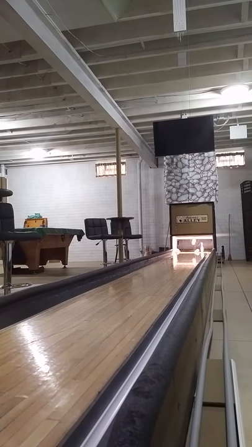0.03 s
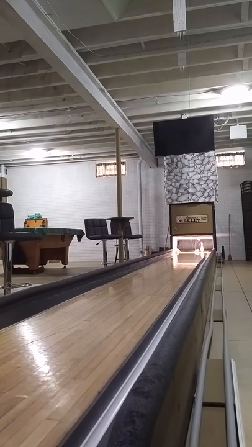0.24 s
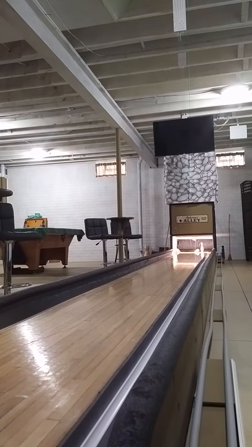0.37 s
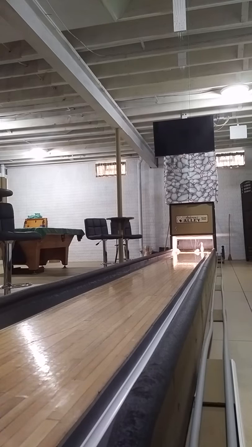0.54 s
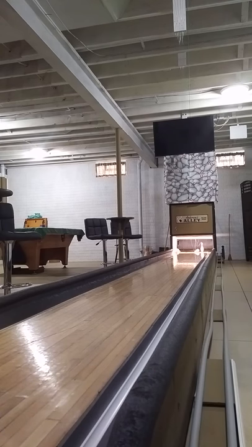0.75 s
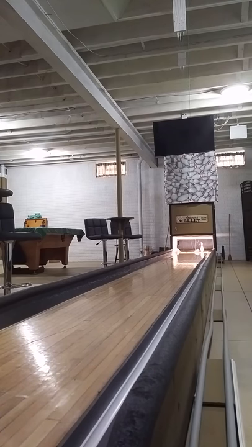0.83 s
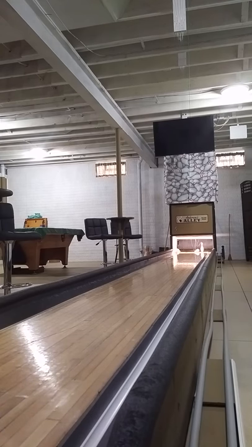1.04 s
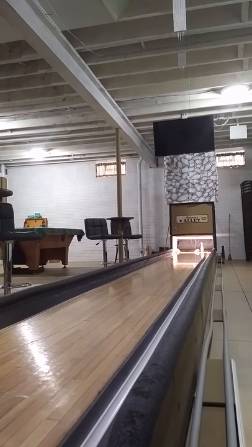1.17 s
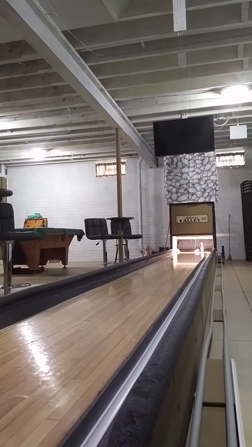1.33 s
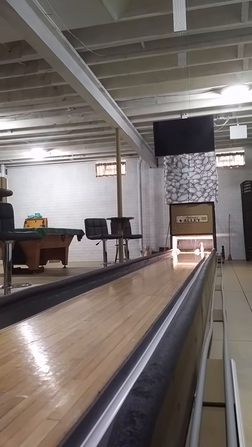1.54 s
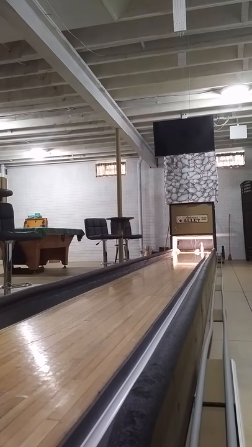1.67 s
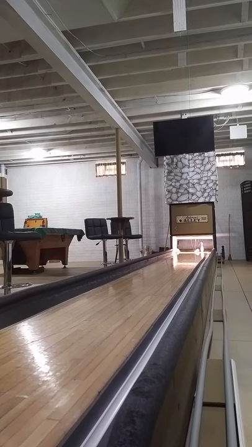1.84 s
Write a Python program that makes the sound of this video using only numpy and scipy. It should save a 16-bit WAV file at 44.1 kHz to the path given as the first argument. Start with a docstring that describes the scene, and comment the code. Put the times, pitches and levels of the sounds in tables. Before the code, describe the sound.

Distant bowling pins knock together hollowly as a pin-setting machine rumbles and hums in a quiet basement

```python
"""Quiet room tone and a thin whine, then a faint dull noise: a string pinsetter far down a small basement bowling lane.
Wooden pins clunk on each other and the rack, rumble and jostle on their strings, then knock once more.
Clunks and rumble are noise shaped into room echoes; each clunk also rings the machine's housing as decaying sines.
Wavering tones make the motor's hum and the frame's drone; short bursts of band noise make the taps."""
import sys
import numpy as np
from scipy import signal
from scipy.fft import rfft, irfft
from scipy.io import wavfile

SR = 44100
rng = np.random.default_rng(int(sys.argv[2]) if len(sys.argv) > 2 else 0)


def inscribe(sig):
    """Save sig as 16-bit PCM at rate SR to the path in sys.argv[1].

    A 1-D sig is mono; a 2-D sig holds one channel per row.
    Samples are clipped to [-1, 1] before scaling.
    """
    pcm = np.round(np.clip(np.atleast_2d(sig).T, -1, 1) * 32767)
    wavfile.write(sys.argv[1], SR, pcm.astype(np.int16))


N = 83790  # samples, 1.9 s


def amp(db):
    """Decibels to gain."""
    return 10 ** (np.asarray(db) / 20)


def unit(x):
    """Scales to an rms of one."""
    return x / np.sqrt(np.mean(x ** 2) + 1e-20)


def by_hz(points, hz):
    """Reads a (hz, value) table on a log-frequency axis."""
    f, value = np.transpose(points)
    return np.interp(np.log(hz + 1), np.log(f + 1), value)


def level(points):
    """Gain for every sample from a (time_s, level_db) curve."""
    return amp(np.interp(np.arange(N) / SR, *np.transpose(points)))


def dying(t, t60):
    """Exponential decay that falls 60 dB in t60 seconds."""
    return np.exp(-np.log(1000) * t / t60)


def add(mix, s, sound):
    """Mixes a sound in at a time in seconds."""
    part = mix[max(round(s * SR), 0):][:len(sound)]
    part += sound[:len(part)]


def coloured(x, points):
    """Filters a sound by a (hz, level_db) curve."""
    gain = amp(by_hz(points, np.fft.rfftfreq(len(x), 1 / SR)))
    return irfft(rfft(x) * gain, len(x))


def room_echoes(colour):
    """A blow as the room returns it: dense echoes that build up and die away band by band."""
    # decay of the room: hz, t60_s
    room = [(60, 1.57), (130, 0.59), (300, 0.68), (700, 0.78), (1800, 0.79), (5000, 0.56), (12000, 0.29)]
    # time constant of the echoes' build-up: hz, rise_s
    build_up = [(60, 0.027), (250, 0.015), (700, 0.0022), (2000, 0.0055), (8000, 0.0081)]
    echo_spread_db, mixing_s = 2.5, 0.026  # early echoes are uneven, later ones blend
    t, hz = np.arange(N) / SR, np.fft.rfftfreq(N, 1 / SR)
    uneven = np.interp(t, np.linspace(0, N / SR, N // 64), rng.standard_normal(N // 64))
    echoes = rng.standard_normal(N) * amp(echo_spread_db * uneven * np.exp(-t / mixing_s))
    spectrum = rfft(echoes) * amp(colour(hz))
    centres = np.geomspace(60, 12000, 9)
    out = np.zeros(N)
    # overlapping bands, each with a weight of one at its own centre and zero at the others
    for centre, pick in zip(centres, np.eye(len(centres))):
        band = irfft(spectrum * by_hz(np.c_[centres, pick], hz), N)
        rise = 1 - np.exp(-t / by_hz(build_up, centre))
        out += band * rise * dying(t, by_hz(room, centre))
    return out


def wavering(lines, depth, rate_hz):
    """Tones whose strength and phase drift as slow noise, brought together to an rms of one."""
    t, hz = np.arange(N) / SR, np.fft.rfftfreq(N, 1 / SR)
    lowpass = np.exp(-(hz / rate_hz) ** 2)
    out = np.zeros(N)
    for line_hz, db in lines:
        swell, drift = (unit(irfft(rfft(z) * lowpass, N)) for z in rng.standard_normal((2, N)))
        phase = 2 * np.pi * line_hz * t + 2 * depth * drift
        out += amp(db) * (1 + .5 * depth * swell) * np.sin(phase)
    return unit(out)


def air():
    """Still air and microphone hiss as coloured noise, with a thin electrical whine as a steady sine."""
    # colour of the hiss: hz, relative_level_db (per Hz)
    air_colour = [(25, -4), (60, -4.5), (130, -2), (180, -2.5), (300, -3), (450, -2.5), (600, -8),
                  (1200, -10), (2200, -11.5), (4200, -18), (6300, -10.5), (8200, -21.5), (11000, -25),
                  (15500, -28.5)]
    # its strength: time_s, level_db
    air_curve = [(0, -61), (.2, -63.5), (1.0, -58.5), (1.9, -67.5)]
    whine_hz, whine_db = 13060, -77  # rms level
    whine = amp(whine_db) * np.sqrt(2) * np.sin(2 * np.pi * whine_hz * np.arange(N) / SR)
    hiss = unit(coloured(rng.standard_normal(N), air_colour))
    return hiss * level(air_curve) + whine


def dull_noise():
    """A faint dull noise, mostly below 2 kHz, that swells just before the first clunk and fades."""
    # strength of the noise: time_s, level_db
    noise_curve = [(.12, -83), (.142, -56), (.17, -49), (.2, -55), (.26, -75)]
    # its colour: hz, relative_level_db (per Hz)
    noise_colour = [(50, -14), (140, -12), (300, -5), (700, -2), (1200, -7), (1750, -7.5), (2100, -23.5),
                    (8000, -42)]
    sounding = np.arange(N) / SR < noise_curve[-1][0]
    return unit(coloured(rng.standard_normal(N), noise_colour)) * level(noise_curve) * sounding


def rack():
    """The moving rack: many small dull jolts at random moments blur into a rumble in the room."""
    # strength of the jolting: time_s, level_db
    rumble_curve = [(.12, -83), (.2, -61), (.36, -37.5), (.45, -58), (.6, -35.5), (.8, -38), (.89, -37.5),
                    (.97, -31), (1.08, -35), (1.2, -32), (1.31, -44), (1.37, -49), (1.55, -57.5),
                    (1.8, -67)]
    # colour of a jolt: hz, relative_level_db (per Hz)
    rumble_colour = [(30, -44), (70, -21), (125, 2), (178, -12.5), (214, 2), (275, 5), (325, 2), (400, -1),
                     (520, -6), (800, -18), (1400, -31), (3000, -39), (6500, -34), (10000, -58)]
    jolts_per_s, jolt_spread_db = 160, 3
    struck = rng.random(N) < jolts_per_s / SR
    strengths = amp(jolt_spread_db * rng.standard_normal(N))
    jolts = struck * rng.choice([-1, 1], N) * strengths
    response = room_echoes(lambda hz: by_hz(rumble_colour, hz))
    response = response / np.linalg.norm(response)
    return signal.fftconvolve(unit(jolts) * level(rumble_curve), response)[:N]


def motor():
    """The drive motor's low hum while the strings are driven: two wavering tones."""
    # strength of the hum: time_s, level_db
    motor_curve = [(.15, -68), (.28, -53), (.38, -53.5), (.5, -50), (.85, -50), (1.15, -59), (1.35, -51),
                   (1.6, -49.5), (1.8, -60), (1.9, -69)]
    # its lines: hz, relative_level_db
    hum_lines = [(62, 8), (119, 0)]
    return wavering(hum_lines, depth=0.24, rate_hz=15) * level(motor_curve)


def housing(ring_db):
    """The hollow ring of the machine's housing after a blow: decaying modes with a soft onset."""
    # modes of the housing: hz, relative_level_db, t60_s
    modes = [(140.6, -5, 0.24), (235.8, -9, 0.65), (305, -2, 0.58), (380, -9, 0.45), (466, -5, 0.3),
             (639, -12, 0.59), (751.6, -2.5, 0.15), (817.5, -13.5, 0.4), (1003, -19, 0.4),
             (1070, -13.5, 0.55), (1454, -18, 0.46), (1719, -21.5, 0.49), (2017, -17, 0.31)]
    rise_s = 0.011
    detune = 0.0025  # each blow lands on another spot and shifts the modes by about this share
    t = np.arange(SR) / SR
    ring = np.zeros(SR)
    for hz, db, t60 in modes:
        mode_hz = hz * (1 + detune * rng.standard_normal())
        ring += amp(db) * dying(t, t60) * np.sin(2 * np.pi * (mode_hz * t + rng.random()))
    return amp(ring_db) * ring * (1 - np.exp(-t / rise_s))


def pins():
    """Each clunk of wood has its own share of thud, body and clack in the room, and rings the housing."""
    # pin clunks: start_s, bass_thud_db, wooden_body_db, treble_clack_db, housing_ring_db
    # (the thud, body and clack levels add to the wood's colour, the ring's to the housing's modes)
    clunks = [(0.199, -37, -27, -33.5, -34.5), (.222, -40, -44, -54, -25.5), (.444, -28, -28, -31.5, -25.5),
              (.470, -27.5, -21.5, -52, -22), (.546, -38, -30.5, -30.5, -29),
              (.588, -30, -29.5, -35.5, -25), (.617, -32, -32, -49.5, -29.5),
              (0.701, -55, -36, -49.5, -37.5), (.752, -52, -49, -47, -39), (0.898, -52, -48.5, -52, -50),
              (0.929, -31.5, -51, -57, -43.5), (1.005, -39, -51, -50.5, -60),
              (1.030, -50, -43.5, -50.5, -39), (1.117, -45, -40, -51, -43.5),
              (1.193, -42, -40.5, -45.5, -32.5), (1.218, -44, -39, -48, -40.5),
              (1.255, -30, -35.5, -45, -50), (1.282, -56, -32.5, -39.5, -28.5),
              (1.319, -35.5, -31, -63, -33), (1.388, -79, -31, -74, -40), (1.519, -64, -66, -65, -58),
              (1.835, -63, -56, -98, -61)]
    # colour that all clunks share: hz, relative_level_db (per Hz)
    wood = [(30, -28), (46, -14), (62, 10), (130, 22.5), (180, 8.5), (240, 19.5), (340, 17.5), (480, 11),
            (700, 10.5), (1200, 10.5), (1800, 4), (2600, 3), (4800, 2.5), (6400, 7.5), (7300, -1.5),
            (8300, -8), (11000, -18), (15500, -38)]
    thud_hz, body_hz, clack_hz = 133, 515, 4300  # where the three strengths apply
    out = np.zeros(N)
    for s, thud_db, body_db, clack_db, ring_db in clunks:
        blow = [(thud_hz, thud_db), (body_hz, body_db), (clack_hz, clack_db)]
        add(out, s, room_echoes(lambda hz: by_hz(wood, hz) + by_hz(blow, hz)))
        add(out, s, housing(ring_db))
    return out


def frame():
    """The rack frame drones at its resonances while the strings pull: two strongly wavering tones."""
    # strength of the drone: time_s, level_db
    drone_curve = [(.45, -85), (.5, -58), (.61, -28.5), (.72, -37), (.81, -36), (.89, -53.5), (.945, -36.5),
                   (1.0, -55), (1.06, -36.5), (1.11, -37.5), (1.17, -33.5), (1.34, -38), (1.39, -71),
                   (1.5, -86)]
    # resonances of the frame: hz, relative_level_db
    resonances = [(313.5, -3), (216.5, -11)]
    return wavering(resonances, depth=0.78, rate_hz=21.6) * level(drone_curve)


def ticks():
    """Short taps of pins and fittings: noise in one band each, quick to rise and dying away."""
    # taps: start_s, level_db (before the rise and decay), centre_hz, width_octaves, t60_s
    taps = [(.546, -26, 1610, 0.22, 0.046), (0.592, -31.5, 2170, 0.77, 0.045),
            (.600, -24.5, 1290, 1, 0.024), (1.392, -36.5, 630, 0.22, 0.089),
            (1.629, -58, 3180, 0.76, 0.083), (1.748, -57, 13000, 1.1, 0.064), (1.795, -64, 2800, 1, 0.068)]
    rise_s = 0.0014
    out, t, hz = np.zeros(N), np.arange(N) / SR, np.fft.rfftfreq(N, 1 / SR)
    for s, db, centre_hz, octaves, t60 in taps:
        band = np.exp(-.5 * (np.log2((hz + 1) / centre_hz) / octaves) ** 2)
        tap = unit(irfft(rfft(rng.standard_normal(N)) * band, N))
        add(out, s, amp(db) * tap * (1 - np.exp(-t / rise_s)) * dying(t, t60))
    return out


def scene():
    """Everything as heard from the near end of the lane, in one channel."""
    return (air() + dull_noise() + rack() + motor() + pins() + frame() + ticks())[None]


def record(dry):
    """The microphone sheds the deepest bass; then a steep lowpass limits the band."""
    bass_cut_hz, edge_hz = 42, 15700
    bass_cut = signal.butter(2, bass_cut_hz, "highpass", fs=SR, output="sos")
    lean = signal.sosfilt(bass_cut, dry)
    lowpass = signal.firwin(511, edge_hz, window=("kaiser", 9), fs=SR)
    return signal.oaconvolve(lean, lowpass[None], "same")


dry = scene()
out = record(dry)
inscribe(out)
```